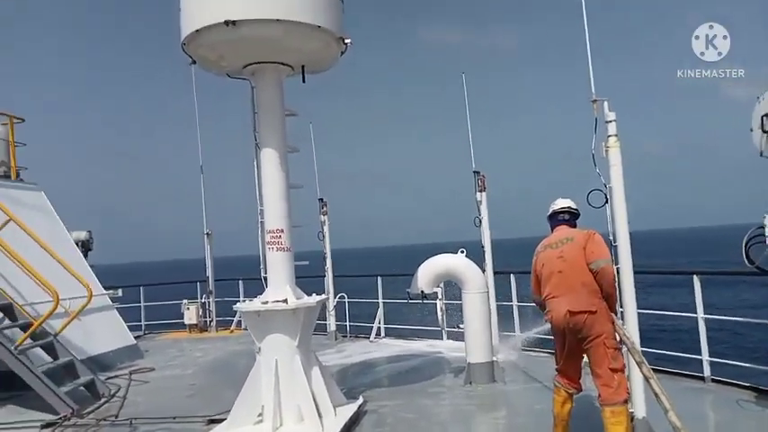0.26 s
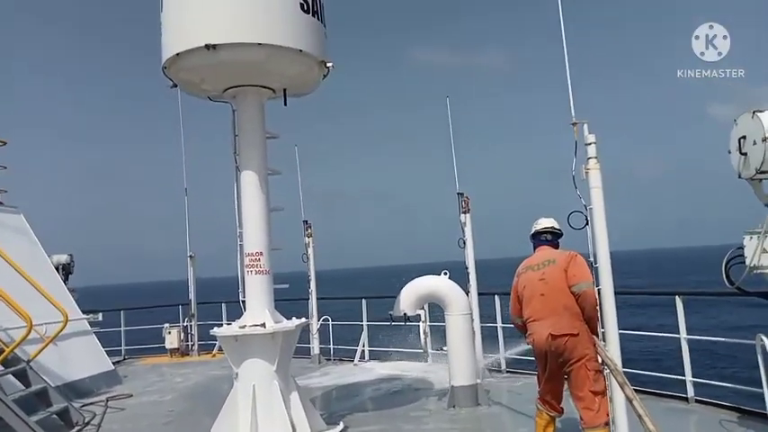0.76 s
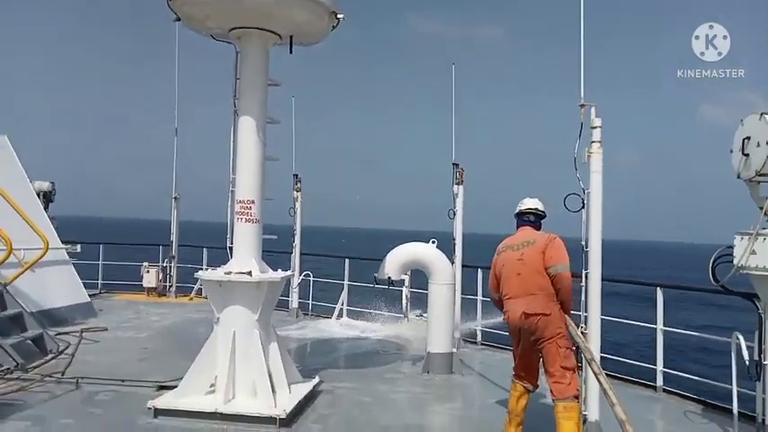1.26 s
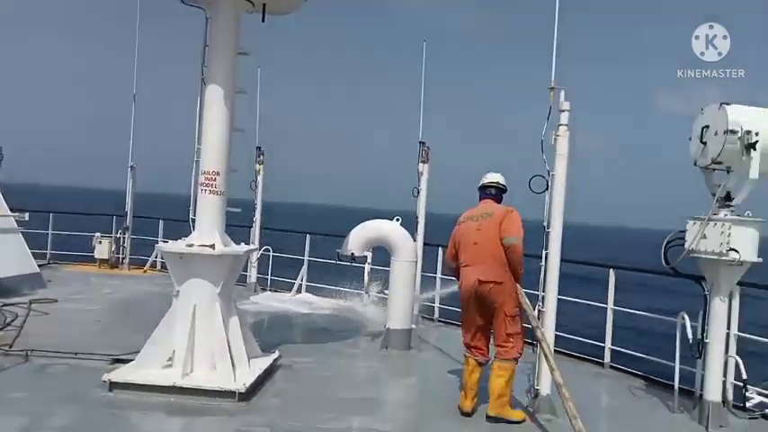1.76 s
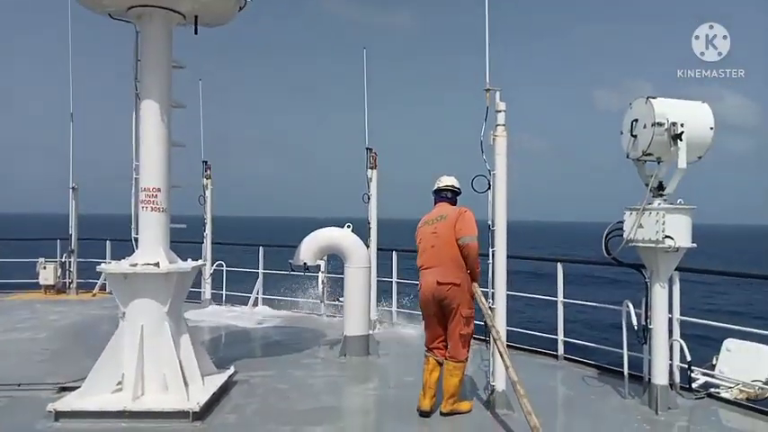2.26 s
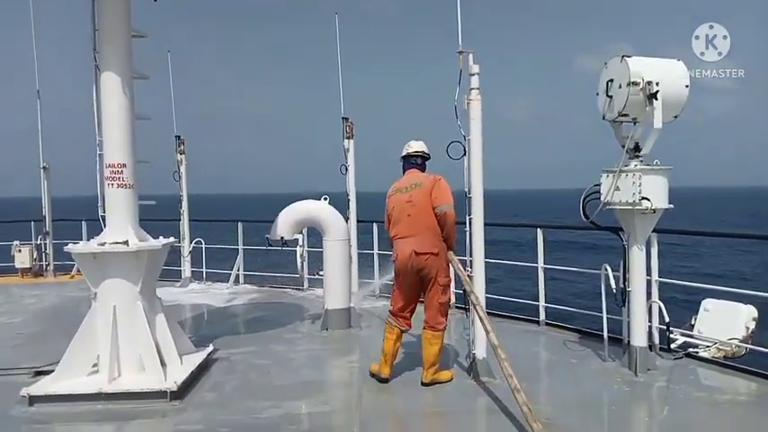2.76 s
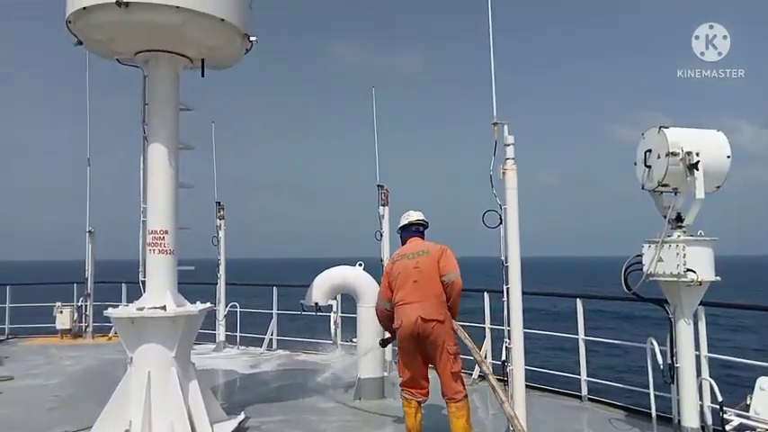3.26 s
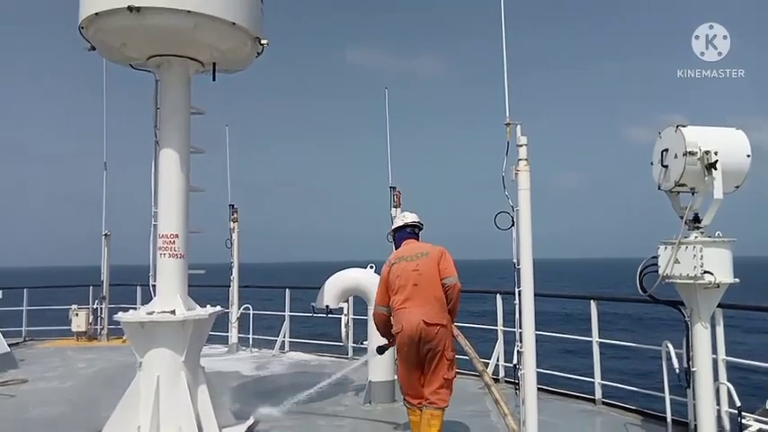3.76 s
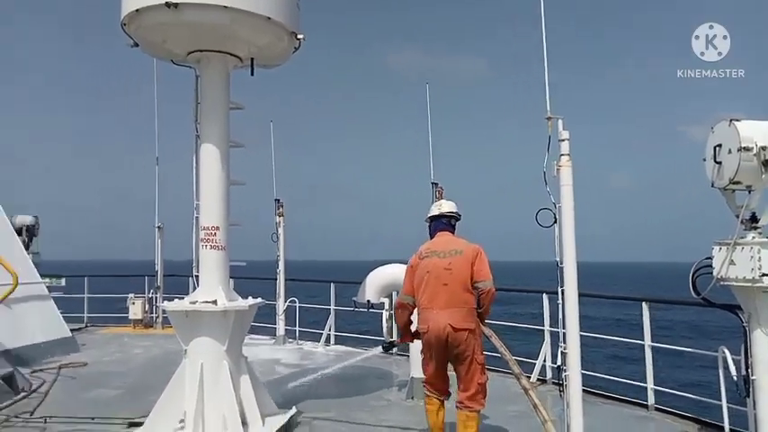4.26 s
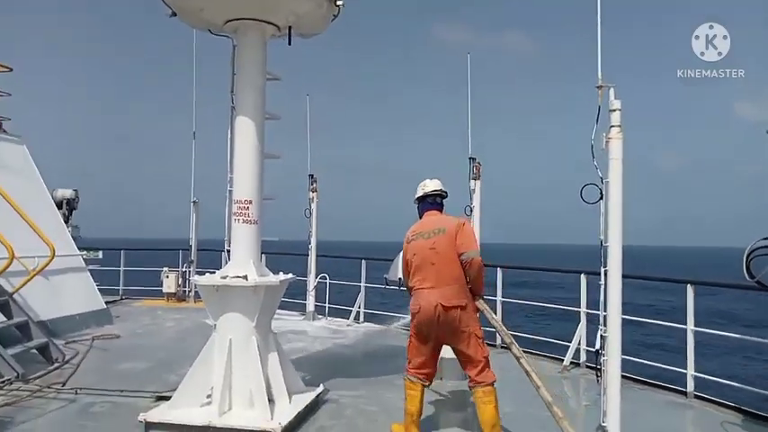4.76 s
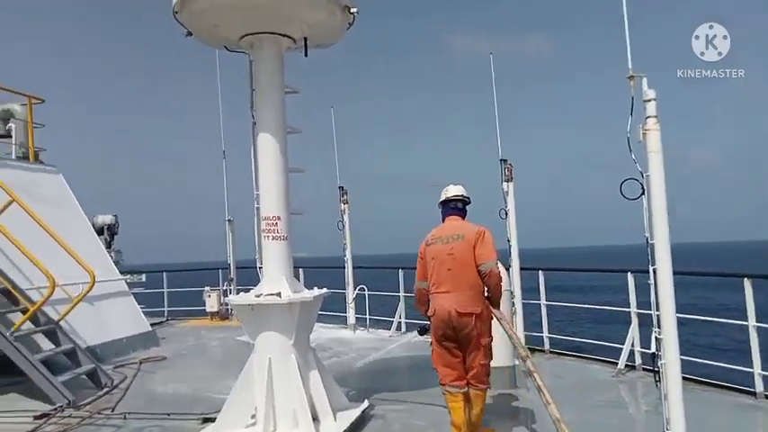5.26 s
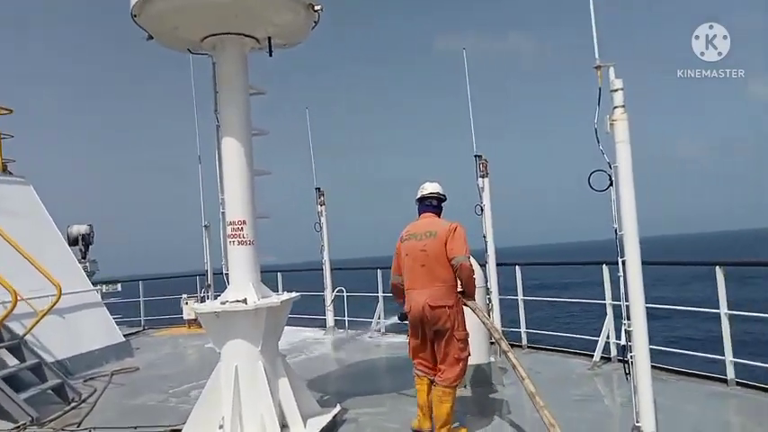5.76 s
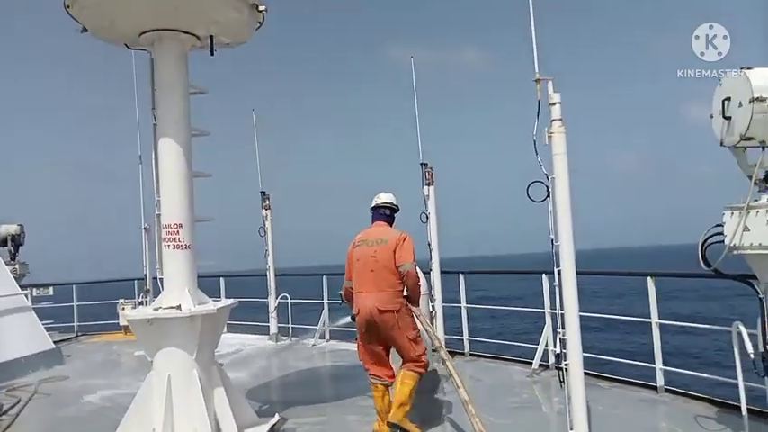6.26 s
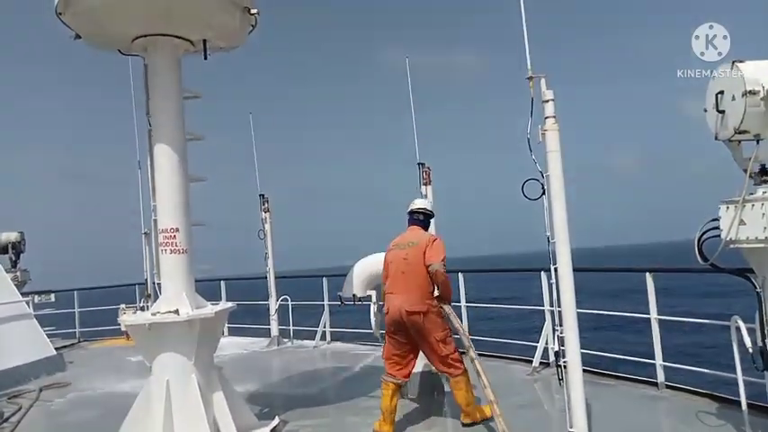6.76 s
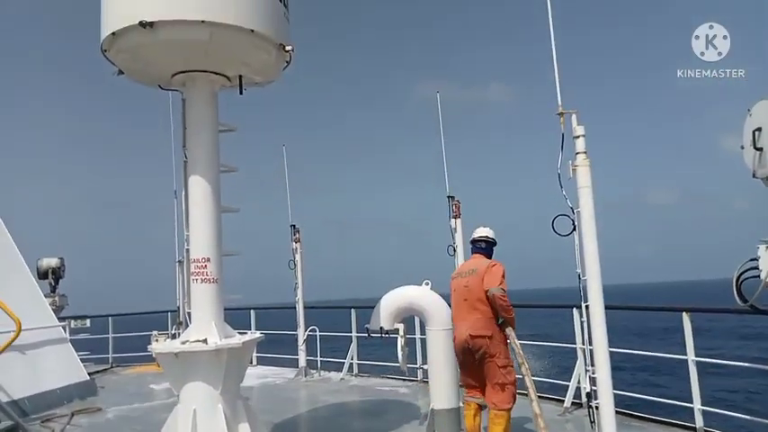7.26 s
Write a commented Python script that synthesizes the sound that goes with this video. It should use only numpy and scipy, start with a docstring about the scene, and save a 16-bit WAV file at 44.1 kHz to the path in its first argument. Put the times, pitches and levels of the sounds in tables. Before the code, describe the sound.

A hose sprays water across a steel ship deck over a low diesel engine throb, with wind gusts buffeting the microphone.

```python
"""The steel top deck of a ship under way, where a deckhand is hosing down.
The jet is made of random drops over noise: bright spray, beating on ringing steel and splatter in puddles.
It flares up as it sweeps over posts and pipes; the nozzle clacks in the hand as short resonant rattles.
The diesel's exhaust throbs unevenly below, five cycles a second, as a sum of engine orders over a gas rush.
Gusts of sea wind, made of lumpy low noise and thumping eddies, buffet the microphone."""
import sys
import numpy as np
from scipy import signal
from scipy.fft import rfft, irfft, next_fast_len
from scipy.io import wavfile
from scipy.ndimage import uniform_filter1d

SR = 44100
rng = np.random.default_rng(int(sys.argv[2]) if len(sys.argv) > 2 else 0)


def put_to_file(sound):
    """Save the sound as 16-bit audio at rate SR, in the file named by the first command-line argument."""
    columns = np.atleast_2d(sound).T  # one column per channel
    safe = np.clip(columns, -1, 1)
    whole_steps = np.round(safe * 32767)
    wavfile.write(sys.argv[1], SR, whole_steps.astype(np.int16))


N = 331279
TIME = np.arange(N) / SR


def from_db(db):
    """Decibels to amplitude gain."""
    return 10 ** (np.asarray(db) / 20)


def rms_one(x):
    """Scale to an rms of 1."""
    return x / np.sqrt(np.mean(x ** 2) + 1e-20)


def in_time(rows):
    """The columns of a curve, interpolated at every sample."""
    s, *columns = np.transpose(rows)
    return [np.interp(TIME, s, column) for column in columns]


def drift(rate):
    """Slow random wander with spread about 1: noise through two equal low-pass poles at `rate` Hz."""
    step = 40  # samples between the points of the slow curve
    pole = np.exp(-2 * np.pi * rate * step / SR)
    noise = rng.standard_normal(N // step + 2002)
    # the first 2000 points only settle the filter
    slow = signal.lfilter([1], [1, -2 * pole, pole * pole], noise)[2000:]
    return np.interp(np.arange(N) / step, np.arange(len(slow)), rms_one(slow))


def colour(x, spectrum):
    """Filter a signal by a smooth spectrum that falls away beyond its ends; rms 1."""
    size = next_fast_len(N)
    hz = np.maximum(np.arange(size // 2 + 1) * SR / size, 1)
    knots, db = np.transpose(spectrum)
    low_skirt = 1 / (1 + (knots[0] / 2 / hz) ** 4)
    high_skirt = 1 / (1 + (hz / 2 / knots[-1]) ** 4)
    gain = from_db(np.interp(np.log(hz), np.log(knots), db))
    return rms_one(irfft(rfft(x, size) * low_skirt * high_skirt * gain, size)[:N])


def resonance(x, hz, width):
    """Two-pole resonance `width` Hz wide, with a gain of about 1 on top."""
    r = np.exp(-np.pi * width / SR)
    numerator = np.array([1, 0, -1]) * (1 - r * r) / 2
    denominator = [1, -2 * r * np.cos(2 * np.pi * hz / SR), r * r]
    return signal.lfilter(numerator, denominator, x + 1e-18)


def swell(s, rise, fall):
    """An envelope of height 1 that starts at s, rises and dies away."""
    age = np.maximum(TIME - s, 0)
    shape = (1 - np.exp(-(age / rise) ** 2)) * np.exp(-np.minimum(age / fall, 20))
    return shape / (shape.max() + 1e-9)


def hose(hiss_db, beat_db, churn_db, sputter_db, slap_db, slosh_db, wobble_db):
    """The jet breaks into slugs and drops: bright spray, beating on the steel, splatter in the puddles."""
    # fine spray: (frequency [Hz], relative density [dB per Hz])
    spray_spectrum = [(2500, -47), (4500, -15.5), (5600, -2), (7500, -1.5), (9700, -0.5), (10800, -3),
                      (12000, -0.5), (13800, -11), (15500, -11.5)]
    # water beating on the plating: (frequency [Hz], relative density [dB per Hz])
    plating_spectrum = [(1500, -18), (2600, -1), (3550, 1.5), (4500, 5), (5600, 2), (7200, -1),
                        (10000, -24), (14000, -40)]
    # water churned on the flooded deck: (frequency [Hz], relative density [dB per Hz])
    puddle_spectrum = [(350, -2.5), (550, -13), (780, -8.5), (1100, 1.5), (1600, -3), (2200, -2),
                       (2800, -6), (4000, -17.5)]
    # steel fittings that sing in the jet: (frequency [Hz], width [Hz], gain [dB])
    fittings = [(3148, 125, -0.5), (3997, 48, 0), (4970, 360, -1)]

    spray_level, steel_level, puddle_level = jet_levels()
    spray = drops(spray_spectrum, per_s=3000, spread_db=1.0, mist_db=-3.0, count=6)
    plating = drops(plating_spectrum, per_s=1000, spread_db=2.0, mist_db=3.0, count=4)
    ringing = sum(from_db(db) * resonance(plating, hz, width) for hz, width, db in fittings)
    puddle = drops(puddle_spectrum, per_s=500, spread_db=2.5, mist_db=3.5, count=4)

    spray = deck_colour(spray, patchy_db=2.6, bins=4, frames=11)
    steel = deck_colour(plating + ringing, patchy_db=2.9, bins=3, frames=11)
    puddle = deck_colour(puddle, patchy_db=3.2, bins=3, frames=7)

    # slugs of water arrive unevenly and shake spray and steel together
    slugs = drift(19.5)
    water = spray_level * from_db(hiss_db + sputter_db * slugs) * spray
    water += steel_level * from_db(beat_db + slap_db * slugs) * steel
    # the puddles slosh on their own
    water += puddle_level * from_db(churn_db + slosh_db * drift(18)) * puddle
    # the hand never holds the nozzle quite still
    return water * from_db(wobble_db * drift(7.7))


def jet_levels():
    """Strength of spray, beating and splatter: powers of the steady jet, sweeps and slaps add up."""
    # steady jet on open deck, louder as it is aimed nearer; before the hose's own trims:
    # (time [s], spray hiss level [dB], plating beat level [dB])
    stream = [(0, -41, -45.5), (0.95, -45.5, -45.5), (1.9, -42, -44), (2.5, -44, -43.5), (4.3, -41, -44.5),
              (5.3, -41, -46.5), (6.25, -45.5, -48.5), (7.51, -43.5, -42)]
    # splatter where the jet lands in standing water: (time [s], level [dB])
    flooded = [(0, -53), (1.9, -51), (2.1, -44.5), (2.4, -45), (2.65, -37), (3.1, -41.5), (3.6, -51),
               (3.87, -43), (4.05, -52), (7.51, -55.5)]
    # flares as the jet sweeps over a pipe, post or rail:
    # (middle [s], half length [s], level [dB], steel over spray [dB])
    sweeps = [(0.145, 0.1, -38.5, 5), (0.226, 0.033, -31.5, -5), (0.45, 0.11, -33, 1.5),
              (0.578, 0.065, -29.5, 5.5), (0.684, 0.089, -33.5, 26), (1.403, 0.1, -40.5, -4),
              (2.26, 0.076, -32.5, -8), (2.926, 0.14, -32.5, -2), (3.142, 0.14, -26.5, -8),
              (3.293, 0.042, -26, 1.5), (3.365, 0.23, -29, -11.5), (3.933, 0.069, -31.5, -0.5),
              (4.033, 0.11, -34.5, -32), (4.27, 0.14, -40.5, -5), (5.13, 0.13, -40.5, -2),
              (5.612, 0.1, -39.5, -32), (6.43, 0.074, -36.5, -13), (6.704, 0.086, -39.5, -14),
              (6.944, 0.089, -28, -8), (7.006, 0.026, -21.5, -1.5), (7.048, 0.013, -20.5, 1),
              (7.135, 0.082, -30.5, -0.5), (7.31, 0.06, -38, 11), (7.361, 0.018, -28, 32),
              (7.505, 0.035, -36.5, -2)]
    # the jet slaps across an edge: (time [s], level [dB], die-away [s], steel over spray [dB])
    splashes = [(1.993, -36, 0.057, -11), (2.566, -26.5, 0.079, -6), (2.805, -31, 0.079, -3),
                (4.448, -36, 0.016, 4), (5.774, -33, 0.059, 0), (5.909, -34, 0.077, -6.5),
                (6.3155, -37, 0.018, -25), (7.415, -29, 0.019, 6)]
    splash_rise_s = 0.0028
    runoff_db = -8.5  # water thrown off the steel splatters too, relative to the beating

    flares = []
    for s, half, db, steel_db in sweeps:
        bump = np.exp(-np.minimum(((TIME - s) / half) ** 2, 20))
        flares.append((from_db(db) * bump, steel_db))
    for s, db, fall, steel_db in splashes:
        flares.append((from_db(db) * swell(s, splash_rise_s, fall), steel_db))

    spray, steel = from_db(in_time(stream)) ** 2
    for flare, steel_db in flares:
        airborne = 1 / (1 + from_db(steel_db) ** 2)  # share of the power that goes to spray
        spray = spray + airborne * flare ** 2
        steel = steel + (1 - airborne) * flare ** 2
    puddle = from_db(in_time(flooded)[0]) ** 2 + from_db(runoff_db) ** 2 * steel
    return np.sqrt([spray, steel, puddle])


def drops(spectrum, per_s, spread_db, mist_db, count):
    """Uneven drops, `per_s` in each of `count` pitch registers, over a mist too fine to tell apart."""
    size = next_fast_len(N)
    ends = np.log([spectrum[0][0], spectrum[-1][0]])
    log_hz = np.log(1 + np.arange(size // 2 + 1) * SR / size)
    register = np.interp(log_hz, ends, [0, count - 1])
    impacts = 0
    for k in range(count):
        sizes = from_db(spread_db * np.minimum(rng.exponential(1, N), 5))
        signed = sizes * rng.choice([-1, 1], N)
        lands = rng.random(N) < per_s / SR
        band = np.sqrt(np.maximum(1 - np.abs(register - k), 0))  # neighbours overlap at equal power
        impacts += rfft(signed * lands, size) * band
    ticks = rms_one(irfft(impacts, size)[:N])
    mist = from_db(mist_db) * rng.standard_normal(N)
    return colour(ticks + mist, spectrum)


def deck_colour(x, patchy_db, bins, frames):
    """Reflections off deck, rails and posts add and cancel: random patches of colour, at an even level."""
    spectra = signal.stft(x, nperseg=1024)[2]
    patches = rng.standard_normal(spectra.shape)
    # smooth twice across frequency bins and time frames
    for _ in range(2):
        patches = uniform_filter1d(patches, bins, axis=0, mode="wrap")
        patches = uniform_filter1d(patches, frames, axis=1, mode="wrap")
    gain = from_db(patchy_db * rms_one(patches))
    coloured = signal.istft(spectra * gain, nperseg=1024)[1][:N]
    return coloured / np.sqrt(uniform_filter1d(coloured ** 2, size=4000))


def nozzle(width_hz, rattle_s):
    """Each clack is a short noise rattle through one broad, doubled resonance of the nozzle."""
    # clacks in the hand: (time [s], peak level [dB], pitch [Hz])
    clacks = [(2.362, -30, 2220), (3.93, -21, 2420), (3.9435, -16.5, 2040), (3.966, -29, 2130),
              (4.449, -32, 2470)]
    out = np.zeros(N)
    for s, db, hz in clacks:
        rattle = rng.standard_normal(N) * swell(s, rise=0.00021, fall=rattle_s)
        knock = resonance(resonance(rattle, hz, width_hz), hz, width_hz)
        out += from_db(db) * knock / np.abs(knock).max()
    return out


def engine(waver, rumble_db, throb):
    """The puffs set the timing of each engine order, the funnel its level; gas rushes with the throb."""
    cycle_hz = 5.0
    # exhaust puffs of the eight cylinders: (time within the cycle [s], strength [dB])
    puffs = [(.0162, -2.5), (.0459, -7), (.062, -3.5), (.0898, -8), (.1118, -1.5), (.1381, -13),
             (.1672, -11), (.1936, -4)]
    # tones that the funnel lets out: (multiple of the cycle rate, rms before the exhaust curve [dB])
    funnel = [(7, -48), (8, -47), (9, -41), (10, -51), (11, -47), (12, -48), (13, -43), (14, -36),
              (15, -34), (16, -38), (17, -33), (18, -27), (19, -60), (20, -35), (21, -43), (22, -34),
              (23, -24), (24, -42), (25, -42), (26, -26), (27, -49), (28, -38), (29, -38), (30, -34),
              (31, -37), (32, -39), (33, -49), (34, -38), (35, -37), (36, -57), (37, -50), (41, -52),
              (54, -53), (61, -53)]
    # rush of exhaust gas and sea: (frequency [Hz], relative density [dB per Hz])
    rumble = [(30, -34), (50, 0), (80, -6.5), (125, 1.5), (170, -0.5), (225, -18), (270, -13), (310, -19),
              (360, -23.5), (530, -22), (780, -32), (1600, -39.5)]
    # the exhaust as it carries across the deck: (time [s], gain [dB])
    exhaust = [(0, -0.5), (1.4, -0.66), (2.8, 0), (4.1, 1), (5.2, 0.2), (6.4, -0.9), (7.51, -1.5)]

    when, strength_db = np.transpose(puffs)
    tones = np.zeros(N)
    for order, db in funnel:
        w = 2 * np.pi * cycle_hz * order
        lead = np.angle(np.sum(from_db(strength_db) * np.exp(-1j * w * when)))
        # uneven combustion and moving air make every tone waver
        strength = np.sqrt(2) * from_db(db) * (1 + waver * drift(1.0))
        tones += strength * np.cos(w * TIME + lead)
    pulsing = rms_one(np.sqrt(np.abs(uniform_filter1d(tones ** 2, size=600))))
    rush = colour(rng.standard_normal(N), rumble) * rms_one(1 + throb * pulsing)
    return from_db(in_time(exhaust)[0]) * (tones + from_db(rumble_db) * rush)


def wind(gust_db, eddy_db, buffet_db, lumpy_db, attack, release):
    """Lumpy turbulence at the microphone port; an uneven train of eddies thumps out of each gust."""
    # turbulence of the gusts: (frequency [Hz], relative density [dB per Hz])
    turbulence = [(30, -18), (80, -24), (150, -0.5), (260, -7.5), (450, -12), (700, -26.5), (1100, -29.5),
                  (1700, -50), (3000, -74)]
    # a sharp eddy reaches higher: (frequency [Hz], relative density [dB per Hz])
    thump_spectrum = [(40, -41), (90, 6.5), (170, 4), (280, 1), (480, -8), (750, -16.5), (1200, -27),
                      (1800, -36.5), (3000, -60)]
    # the hardest eddies, which thump the microphone: (time [s], level before buffet_db [dB])
    buffets = [(0.012, -4.5), (0.047, -16), (0.127, -16), (0.198, -10), (0.222, -12.5), (0.315, -16),
               (0.5, -15.5), (2.533, -22.5), (5.34, -14.5), (5.52, -15), (5.715, -13), (6.545, -19),
               (6.641, -13), (6.779, -13), (6.814, -17.5), (6.842, -11), (7.14, -13), (7.184, -10.5),
               (7.231, -10.5), (7.289, -13), (7.366, -10), (7.401, -11), (7.444, -13.5)]
    eddies_per_s, eddy_spread_db = 24, 3.5

    blow = gust_level()
    turns = np.arange(int(eddies_per_s * N / SR))
    times = (turns + rng.random(len(turns))) / eddies_per_s
    strengths_db = eddy_db + eddy_spread_db * rng.standard_normal(len(turns))
    shed = eddies(zip(times, strengths_db), attack, release)
    hardest = from_db(buffet_db) * eddies(buffets, attack, release)
    knocks = np.maximum(blow * shed, hardest)

    thump = colour(rng.standard_normal(N), thump_spectrum)
    # each is one firm push: its pressure swings keep a nearly even strength
    thump /= np.sqrt(uniform_filter1d(thump ** 2, size=500) + .05)
    lumps = from_db(gust_db + lumpy_db * drift(67))
    return blow * lumps * colour(rng.standard_normal(N), turbulence) + knocks * thump


def gust_level():
    """Each gust rises, holds and dies away; the strongest prevails."""
    # gusts at the microphone, before the wind's own trims: (start [s], length [s], level [dB])
    gusts = [(0.0, 0.58, -23), (0.624, 0.059, -21), (0.734, 0.11, -37.5), (0.933, 0.12, -32.5),
             (2.186, 0.055, -36.5), (2.465, 0.16, -26), (2.68, 0.078, -30), (3.672, 0.18, -39),
             (5.073, 0.047, -33), (5.275, 0.11, -23), (5.41, 0.44, -30), (5.466, 0.11, -20.5),
             (5.93, 0.042, -35), (6.504, 0.48, -25), (7.069, 0.41, -21)]
    rise_s, fall_s = 0.014, 0.013
    level = np.zeros(N)
    for s, length, db in gusts:
        rise = 1 - np.exp(-(np.maximum(TIME - s, 0) / rise_s) ** 2)
        fall = np.exp(-np.clip((TIME - s - length) / fall_s, 0, 20))
        level = np.maximum(level, from_db(db) * rise * fall)
    return level


def eddies(rows, attack, release):
    """One short push for each (time [s], level [dB]), steeper on the side with the larger factor."""
    scale_s = 0.019  # divided by attack before the peak and by release after it
    out = np.zeros(N)
    for s, db in rows:
        near = slice(*np.searchsorted(TIME, [s - 2 * scale_s, s + 2 * scale_s]))
        age = (TIME[near] - s) / scale_s
        steepness = np.where(age < 0, attack, release)
        out[near] += from_db(db) * np.exp(-(age * steepness) ** 2)
    return out


def scene():
    """Hose, engine and wind add up in the open air."""
    water = hose(hiss_db=1.5, beat_db=0.5, churn_db=-1.5, sputter_db=1.5, slap_db=1.25,
                 slosh_db=2.9, wobble_db=0.24)
    water += nozzle(width_hz=470, rattle_s=0.0035)
    ship = engine(waver=0.18, rumble_db=-29.5, throb=0.032)
    gusts = wind(gust_db=-1.5, eddy_db=2.0, buffet_db=2.0, lumpy_db=2.5, attack=1.79, release=1.16)
    return (ship + water + gusts)[None]


def record(dry):
    """Soft saturation rounds the strongest peaks; a steep low-pass cuts the top."""
    cutoff_hz = 15500
    rounded = 1.054 * np.tanh(dry / 1.072)
    low_pass = signal.ellip(12, .1, 90, cutoff_hz, fs=SR, output="sos")
    return signal.sosfilt(low_pass, rounded)


dry = scene()
out = record(dry)
put_to_file(out)
```